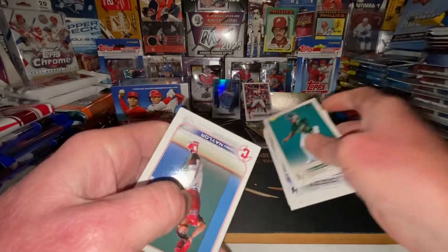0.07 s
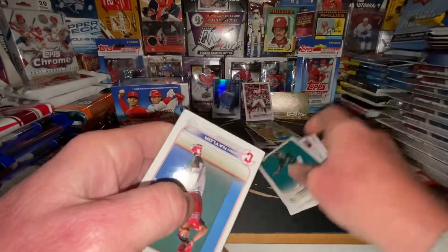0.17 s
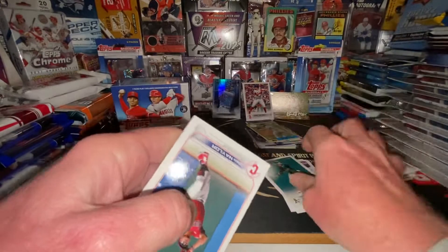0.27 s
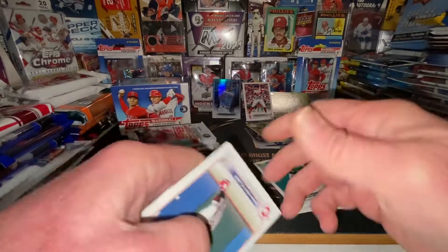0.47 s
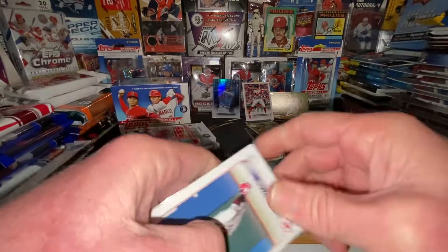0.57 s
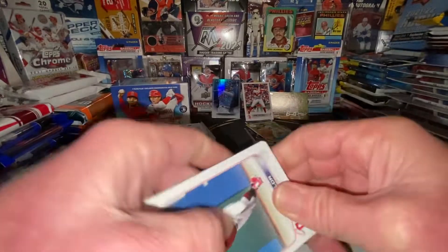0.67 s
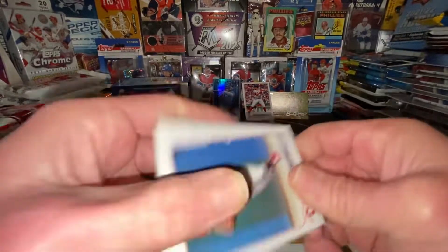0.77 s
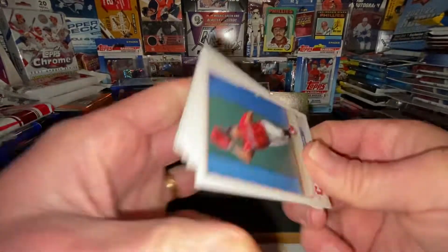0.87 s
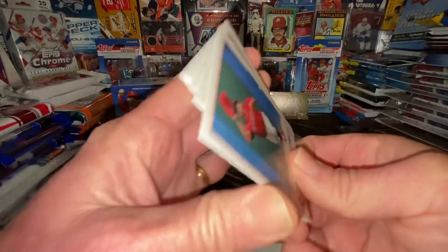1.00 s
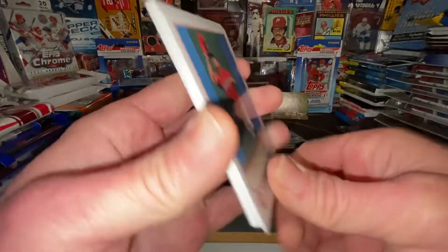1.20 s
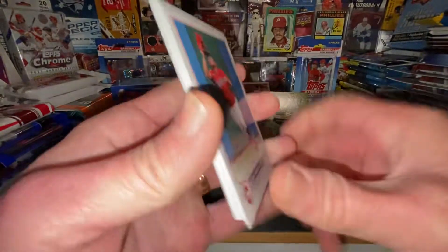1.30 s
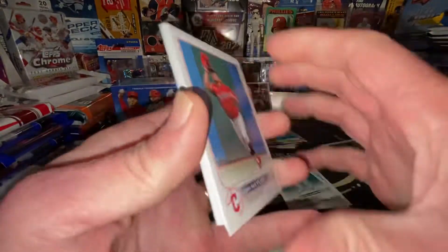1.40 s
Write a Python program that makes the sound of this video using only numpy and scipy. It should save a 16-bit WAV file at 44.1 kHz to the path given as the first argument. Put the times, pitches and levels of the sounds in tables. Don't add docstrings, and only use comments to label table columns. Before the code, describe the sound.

Glossy trading cards are handled close up in a quiet small room. A soft knock at 0.04 seconds and a tick at 0.15 lead to the loudest sound, a stack thumping on a desk at 0.2. Faint sliding follows, a thin bright snap at 0.61, skin rubbing around 0.7-0.8, soft double knocks at 0.87, a low creak near 0.95, and muted knocks at 1.23 and 1.42.

```python
import sys
import numpy as np
from scipy import signal
from scipy.io import wavfile
from scipy.ndimage import uniform_filter1d, minimum_filter1d

SR = 44100
rng = np.random.default_rng(int(sys.argv[2]) if len(sys.argv) > 2 else 0)


def amplitude_ratio(level_db):
    exponent = np.asarray(level_db, float) / 20
    return 10 ** exponent


def dump_mix(stems):
    frames = np.atleast_2d(stems).T
    limited = np.clip(frames, -1, 1)
    pcm = np.round(limited * 32767).astype(np.int16)
    wavfile.write(sys.argv[1], SR, pcm)


N = 63945


def rms_one(x):
    return x / np.sqrt(np.mean(x ** 2) + 1e-20)


def pan(db):
    return amplitude_ratio(np.array([[db / 2], [-db / 2]]))


def butter(x, order, hz, kind="low"):
    return signal.sosfilt(signal.butter(order, hz, kind, fs=SR, output="sos"), x)


RISE_CYCLES, GLIDE = 0.82, 0.8
UNDER_HZ, UNDER_DB, UNDER_T60_S = 178.4, -14.5, 0.063
OVER_DB, OVER_RATIO, OVER_LEAD_CYCLES = -15.5, 1.926, 0.95


def slip(t, db, hz, cycles):
    c = t * hz
    rise = np.exp(-(np.minimum(c, 0) / RISE_CYCLES) ** 2)
    falling = c - GLIDE * np.log(np.cosh(np.clip(c, -3, 3) / 2))
    main = amplitude_ratio(-60 * np.maximum(c, 0) / cycles) * np.cos(2 * np.pi * falling)
    under_level = amplitude_ratio(UNDER_DB - 60 * np.maximum(t, 0) / UNDER_T60_S) * min(1, (350 / hz) ** 2)
    under = under_level * np.cos(2 * np.pi * UNDER_HZ * t)
    edge_shape = np.exp(-((c + OVER_LEAD_CYCLES) / 0.46) ** 2)
    over = amplitude_ratio(OVER_DB) * edge_shape * np.cos(2 * np.pi * OVER_RATIO * c)
    return amplitude_ratio(db + 0.5) * (rise * (main + under) + over)


# t/s, peak level/dB, f/Hz, ring/cycles
DECK_SLIPS = [(0.0442, -34.5, 354, 2.4), (.050, -43, 303, 2.3), (0.0614, -47.5, 316, 3.6),
              (0.101, -46, 250, 4.6), (0.1088, -53, 251, 8), (.672, -52.5, 463, 2.2),
              (0.7331, -44, 372, 2.2), (0.745, -53, 367, 15.6), (0.8655, -32.5, 326, 2),
              (0.8761, -31, 360, 1.8), (0.887, -49.5, 330, 2.2), (0.898, -53, 248, 4),
              (1.037, -44.5, 366, 2.1), (1.117, -50.5, 367, 4.2), (1.2175, -46, 300, 5),
              (1.227, -35, 351, 4.3), (1.2338, -44.5, 285, 3.8), (1.2388, -46, 335, 4.8),
              (1.255, -51, 323, 2.5), (1.4175, -42.5, 801, 18), (1.424, -45, 433, 6.9),
              (1.429, -51, 298, 2.3), (1.441, -64, 189, 8), (.2020, -24.5, 620, 3), (0.2017, -25, 1650, 4),
              (.206, -32.5, 370, 9.3), (0.1495, -37.5, 1390, 2.5), (.0418, -42.5, 510, 1.8),
              (.093, -52, 450, 2.7), (.8695, -42, 247, 2.2), (0.8807, -47.5, 300, 2.7), (.525, -57, 340, 5)]
# t/s, peak level/dB
CREAK_SLIPS = [
    (0.933, -50),
    (0.949, -43.5),
    (0.9581, -48),
    (0.9666, -41.5),
    (.976, -40),
    (0.9858, -55),
    (.993, -52.5),
]
CREAK_HZ, CREAK_CYCLES = 330, 5
DECK_LAG_S, DECK_PAN_DB = 0.00011, 1.45
DECK_LOW_HZ = 129


def deck():
    t = np.arange(N) / SR + np.array([[DECK_LAG_S], [0]])
    out = np.zeros((2, N))
    creak = [(s, db, CREAK_HZ, CREAK_CYCLES) for s, db in CREAK_SLIPS]
    for s, db, hz, cycles in DECK_SLIPS + creak:
        near = slice(max(int((s - .02) * SR), 0), int((s + .12) * SR))
        out[:, near] += slip(t[:, near] - s, db, hz, cycles)
    return butter(out, 2, DECK_LOW_HZ, "high") * pan(DECK_PAN_DB)


# t/s, peak level/dB
DESK_BLOWS = [
    (.108, -43.5),
    (.150, -48),
    (0.2084, -19),
    (.29, -39),
    (.627, -59),
    (.53, -60),
]
# f/Hz, level/dB, t60/s
DESK_MODES = [(77, -21, 0.037), (81.1, -15.5, 0.55), (118, 2.5, 0.077), (127.1, -21.5, 0.55),
              (253.5, -11.5, 0.084), (335.2, -11, 0.19)]
PUSH_HZ, DESK_PAN_DB = 229, 2


def desk():
    clicks = np.full(N, 1e-18)
    for s, db in DESK_BLOWS:
        clicks[int(s * SR)] = -amplitude_ratio(db - 2)
    push = butter(clicks, 4, PUSH_HZ)
    out = 0
    for hz, db, t60 in DESK_MODES:
        r, w = amplitude_ratio(-60 / (t60 * SR)), 2 * np.pi * hz / SR
        out = out + amplitude_ratio(db) * signal.lfilter([0, np.sin(w)], [1, -2 * r * np.cos(w), r * r], push)
    return out * pan(DESK_PAN_DB)


# t/s, rms level/dB, centre f/Hz, half length/s, pan/dB
EDGE_SCUFFS = [(.0405, -53, 5000, 0.0011, 8.5), (0.097, -62.5, 2650, 0.013, 0),
               (0.152, -57, 2800, 0.0022, -7), (0.161, -56, 2770, 0.025, 1.5),
               (0.1915, -45.5, 5840, 0.0028, 8), (.190, -49.5, 2240, 0.0075, -10),
               (.191, -50, 12000, 0.009, 18.5), (0.2015, -43.5, 6200, 0.0026, -1),
               (0.208, -55, 900, 0.0077, -12), (0.679, -60, 5100, 0.011, 5.5), (0.81, -63, 2500, 0.0038, 4),
               (1, -54.5, 7000, 0.00091, 8), (0.844, -62.5, 6900, 0.0046, 8), (0.754, -66, 3900, 0.015, 6),
               (1.028, -64, 11700, 0.004, 19.5), (1.078, -70.5, 3700, 0.0055, 8),
               (1.162, -64.5, 990, 0.008, -8), (1.16, -61.5, 3320, 0.0091, 10.5),
               (1.158, -52.5, 11900, 0.0053, 14), (1.8, -60, 1000, 0.003, 0)]
SCUFF_OCTAVES, SCUFF_GRAIN_DB, SCUFF_LIKENESS = .9, 4.5, .85
PORT_LAG_S = .00004


def scuffs():
    span = np.arange(-2000, 3000)
    t = span / SR
    out = np.zeros((2, N))
    side_gain = np.sqrt((1 - SCUFF_LIKENESS) / (1 + SCUFF_LIKENESS))
    for s, db, hz, half_s, pan_db in EDGE_SCUFFS:
        white = rng.standard_normal((2, len(t)))
        mid, side = white * amplitude_ratio(SCUFF_GRAIN_DB * np.minimum(rng.exponential(1, len(t)), 4))
        band = [hz * 2 ** (-SCUFF_OCTAVES / 2), min(hz * 2 ** (SCUFF_OCTAVES / 2), 16500)]
        noise = rms_one(butter(mid + side_gain * side * [[1], [-1]], 2, band, "band"))
        noise[1] = np.interp(t - PORT_LAG_S, t, noise[1])
        shape = np.where(t < 0, np.exp(-(t / half_s) ** 2), np.exp(-t / half_s))
        at = int(s * SR) + span
        inside = (at >= 0) & (at < N)
        out[:, at[inside]] += (amplitude_ratio(db) * pan(pan_db) * shape * noise)[:, inside]
    return out


# t/s, f/Hz, peak level/dB, half length/s, pan/dB
EDGE_CHATTER = [(0.0404, 1400, -54, 0.00087, -1), (0.0412, 2700, -57, .0008, 5),
                (.040, 11000, -54.5, .00015, 5), (.6125, 15600, -48, .0006, 5),
                (.6125, 7400, -52, .0005, 6), (.6125, 2600, -55, .0006, 4), (.2015, 1600, -31, .0012, -5),
                (.9425, 5600, -61, .0008, 7), (0.0464, 1200, -58, 0.0017, 2),
                (.1495, 2600, -48, 0.0005, -6), (0.1504, 3700, -51, .0006, -3),
                (0.151, 5700, -55, .0006, 2), (0.1503, 600, -52, 0.001, 7), (.1915, 4880, -45, .002, 6),
                (.191, 3200, -45, .0015, 5), (.1885, 5700, -46.5, .002, 8), (0.6717, 1110, -44, .0027, 4),
                (.682, 2420, -62.5, 0.0014, 5.5), (.8105, 1460, -58, 0.0027, 3),
                (0.8117, 2130, -56.5, 0.0028, 4), (.810, 3140, -59, .003, 3), (.812, 5600, -61, .002, 4),
                (.8348, 5500, -53, .0007, 6), (.8343, 7200, -55, .0004, 3), (.8352, 2480, -61, 0.0013, 5),
                (.849, 5300, -62, 0.00089, 5), (0.853, 5570, -54.5, .001, 7), (.8615, 900, -49.5, .001, -3),
                (.862, 4200, -61, 0.0007, 4), (.867, 5600, -57, .001, 7), (0.929, 2950, -60.5, 0.00087, 2),
                (0.931, 5500, -61, 0.0011, 7), (1.0765, 3780, -66, 0.0013, 1),
                (1.4165, 1300, -55, 0.0014, -1), (1.412, 750, -60, 0.0035, 0)]
CHATTER_ROUGH, CHATTER_GRAIN_HZ = .6, 700


def chatter():
    span = np.arange(-1000, 1400)
    t = span / SR
    out = np.zeros((2, N))
    for s, hz, db, half_s, pan_db in EDGE_CHATTER:
        shape = np.exp(-(t / (half_s * np.where(t < 0, .8, 1.3))) ** 2)
        wobble = rms_one(butter(rng.standard_normal(len(t)), 2, CHATTER_GRAIN_HZ))
        tone = np.cos(2 * np.pi * hz * t + CHATTER_ROUGH * wobble)
        out[:, int(s * SR) + span] += amplitude_ratio(db) * pan(pan_db) * shape * tone
    return out


# f/Hz, peak level/dB, t60/s
SNAP_MODES = [(1300, -54, 0.0048), (4000, -47.5, 0.0047), (6020, -43, .012), (8720, -45.5, 0.0049),
              (11330, -40.5, 0.0089), (11930, -39.5, .008), (14300, -43, .006)]
SNAP_S = .6115
# t/s, f/Hz, peak level/dB, t60/s
HARD_CONTACTS = [
    (.668, 1050, -57, 0.08),
    (.668, 1104, -55, 0.037),
]
TICK_RISE, TICK_PAN_DB = 0.055, 7.5


def ticks():
    t, out = np.arange(N) / SR, 0
    for s, hz, db, t60 in HARD_CONTACTS + [(SNAP_S, *mode) for mode in SNAP_MODES]:
        since = np.maximum(t - s, 0)
        rise = 1 - np.exp(-since / (TICK_RISE * t60))
        out = out + amplitude_ratio(db + 5 - 60 * since / t60) * rise * np.sin(2 * np.pi * hz * since)
    return out * pan(TICK_PAN_DB)


def curve(rows):
    s, db = np.transpose(rows)
    return amplitude_ratio(np.interp(np.arange(N) / SR, s, db))


def at_hz(points, hz):
    points = np.array(points)
    return np.interp(np.log(hz), np.log(points[:, 0]), points[:, 1])


def drift(rate):
    r = np.exp(-80 * np.pi * rate / SR)
    slow = signal.lfilter([1], [1, -2 * r, r * r], rng.standard_normal(N // 40 + 2002))[2000:]
    return np.interp(np.arange(N) / 40, np.arange(len(slow)), rms_one(slow))


# f/Hz, share/0-1
PORT_LIKENESS = [(60, 0.38), (900, 0.13), (3000, 0.068), (15000, 0.4)]


def banded(spectrum, patchy_db, grain_db):
    edges = np.geomspace(spectrum[0][0], spectrum[-1][0], 15)
    white = rng.standard_normal((2, 2, N))
    grains = white * amplitude_ratio(grain_db * np.minimum(rng.exponential(1, N), 2.6))
    out, together = 0, drift(19.0)
    for k, (low, high) in enumerate(zip(edges, edges[1:])):
        mid, side = butter(grains[k % 2], 2, [low, high], "band")
        hz = np.sqrt(low * high)
        alike = np.clip(at_hz(PORT_LIKENESS, hz), 0, 1)
        gain = amplitude_ratio(at_hz(spectrum, hz) + patchy_db * (1.57 * together + drift(13.4)))
        out = out + gain * (np.sqrt(1 + alike) * mid + np.sqrt(1 - alike) * side * [[1], [-1]])
    return rms_one(out)


# t/s, level/dB
SLIDE_LEVEL = [(0, -80), (.035, -70), (.09, -65.5), (.19, -59.5), (.25, -72), (.30, -61.5), (.39, -62),
               (.43, -77), (.46, -74), (.51, -62), (.59, -67.5), (.66, -68), (.80, -68), (.822, -74.5),
               (.85, -63), (.96, -67.5), (1.06, -77), (1.45, -75.5)]
# f/Hz, level/dB per Hz
SLIDE_SPECTRUM = [(600, 0), (1000, -1.5), (2200, 1), (4600, 0), (7500, -3.5), (9500, -8.5), (12000, -12)]


def sliding():
    return curve(SLIDE_LEVEL) * pan(4.5) * banded(SLIDE_SPECTRUM, patchy_db=1.0, grain_db=3.5)


# t/s, level/dB
RUB_LEVEL = [(0, -83), (.07, -68.5), (.10, -65), (.18, -57.5), (.24, -80), (.44, -77.5), (.58, -88),
             (.65, -62.5), (.77, -59.5), (.80, -57.5), (.825, -80.5), (.85, -65), (.93, -73.5), (1.0, -70),
             (1.06, -76), (1.10, -67), (1.3, -75), (1.45, -80)]
# f/Hz, level/dB per Hz
RUB_SPECTRUM = [(4500, -22), (5700, -4.5), (8500, -11.5), (11000, -3), (12300, 1.5), (14500, -4),
                (16000, -12)]


def rubbing():
    return curve(RUB_LEVEL) * pan(1.3) * banded(RUB_SPECTRUM, patchy_db=1.5, grain_db=1.5)


# t/s, level/dB
HANDLING_LEVEL = [(0, -73.5), (.08, -61), (.22, -50.5), (.40, -63.5), (.6, -67.5), (.78, -66), (.83, -69.5),
                  (.95, -55.5), (1.08, -73), (1.25, -60), (1.35, -74.5), (1.45, -54)]
# f/Hz, level/dB per Hz
RUMBLE_SPECTRUM = [(35, 5), (70, -6), (130, 0), (220, -18), (340, -5), (500, -15), (900, -27)]


def handling():
    return curve(HANDLING_LEVEL) * banded(RUMBLE_SPECTRUM, patchy_db=2.5, grain_db=.1)


ROOM_T60_S, WET_DB, WALL_CUT_HZ = .09, -14, 3100


def reflections(x):
    t = np.arange(int(.3 * SR)) / SR
    tail = rng.standard_normal((2, len(t))) * amplitude_ratio(-60 * t / ROOM_T60_S) * (t > .002)
    tail = butter(tail, 1, WALL_CUT_HZ)
    tail = tail / np.sqrt(np.sum(tail ** 2) / 2)
    return amplitude_ratio(WET_DB) * signal.fftconvolve(x, tail, axes=1)[:, :N]


# f/Hz, level/dB per Hz
ROOM_SPECTRUM = [(40, 13), (120, -7), (330, -9.5), (900, -11), (8000, -38), (11500, -15), (13500, -17),
                 (16000, -22)]


def room_tone():
    return amplitude_ratio(-75) * banded(ROOM_SPECTRUM, patchy_db=1.2, grain_db=.1)


def scene():
    cards = deck() + scuffs()
    friction = sliding() + rubbing()
    background = handling() + room_tone()
    wet_cards = cards + reflections(cards)
    return wet_cards + chatter() + ticks() + desk() + friction + background


def thin_band(x, low_hz, high_hz):
    leak = amplitude_ratio(-20)
    return x * leak + (1 - leak) * butter(x, 2, [low_hz, high_hz], "bandstop")


BURST_RATIO, BURST_SPAN = 5.0, 4.0


def bursts(x):
    power = np.sum(butter(x, 2, 5000, "high") ** 2, axis=0)
    ratio = uniform_filter1d(power, size=128) / (uniform_filter1d(power, size=4096) + 1e-18)
    share = np.clip((ratio - BURST_RATIO) / BURST_SPAN, 0, 1)
    widened = -minimum_filter1d(-share, size=256)
    return uniform_filter1d(widened, size=128)


def low_pass(x):
    return signal.sosfilt(signal.butter(12, 16790, fs=SR, output="sos"), x)


# centre f/Hz, width/Hz
SUM_THIN_BANDS = [(9300, 500), (13200, 2700)]
LOW_CUT_HZ, TOP_HZ, SIDE_TOP_HZ = 56.7, 16050, 15300
SIDE_THIN_BAND_HZ = (10500, 12000)


def record(dry):
    ports = butter(dry, 4, LOW_CUT_HZ, "high")
    left, right = ports
    mid, side = (left + right) / 2, (left - right) / 2
    for hz, width_hz in SUM_THIN_BANDS:
        mid = thin_band(mid, hz - width_hz / 2, hz + width_hz / 2)
    side = thin_band(thin_band(side, *SIDE_THIN_BAND_HZ), *SIDE_THIN_BAND_HZ)
    mid = signal.sosfilt(signal.cheby2(8, 28, TOP_HZ, fs=SR, output="sos"), mid)
    side = signal.sosfilt(signal.cheby2(8, 30, SIDE_TOP_HZ, fs=SR, output="sos"), side)
    near = bursts(ports)
    mix = near * ports + (1 - near) * np.array([mid + side, mid - side])
    return low_pass(mix)


dry = scene()
out = record(dry)
dump_mix(out)
```